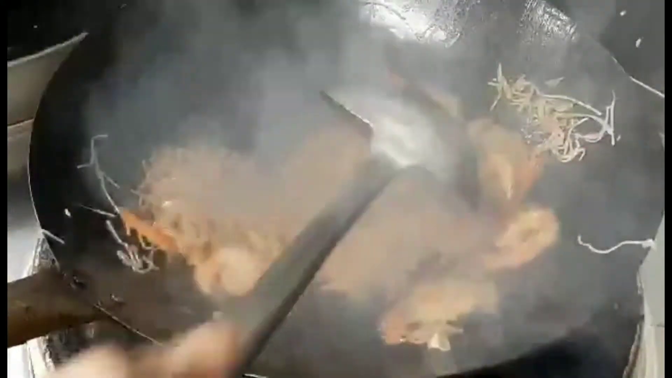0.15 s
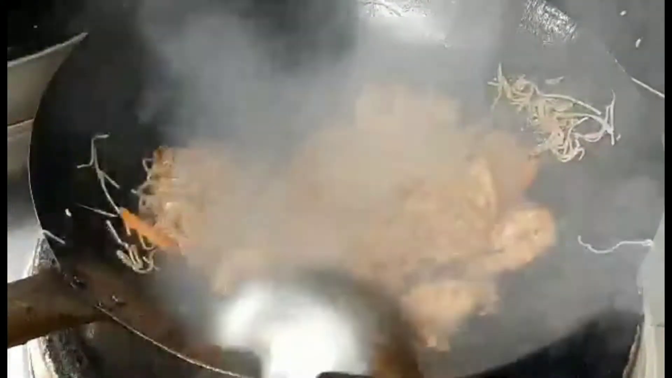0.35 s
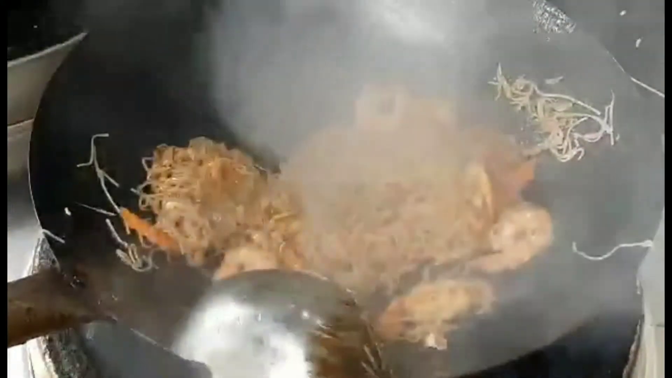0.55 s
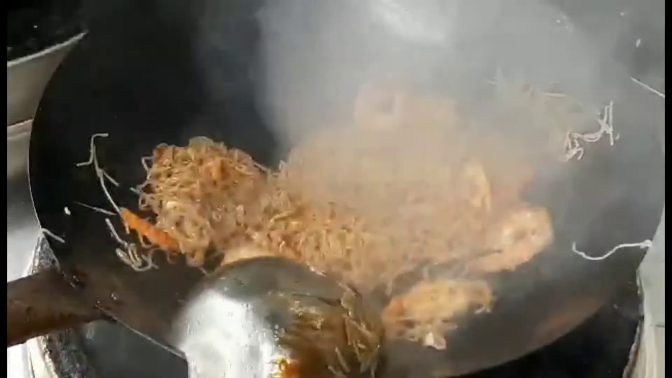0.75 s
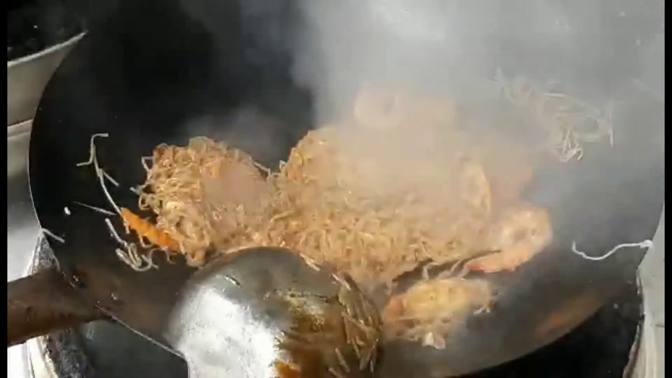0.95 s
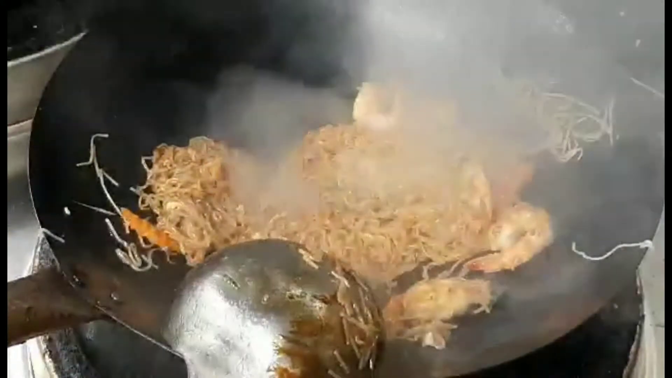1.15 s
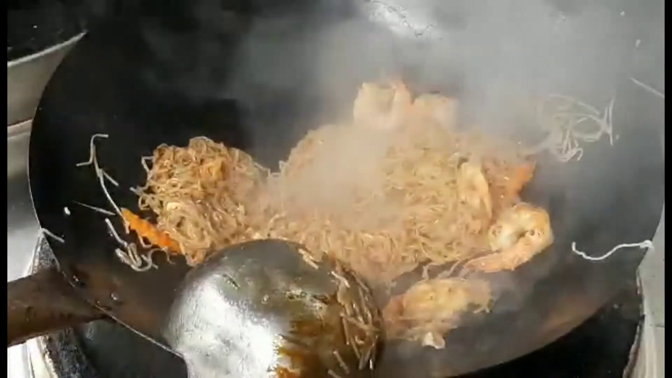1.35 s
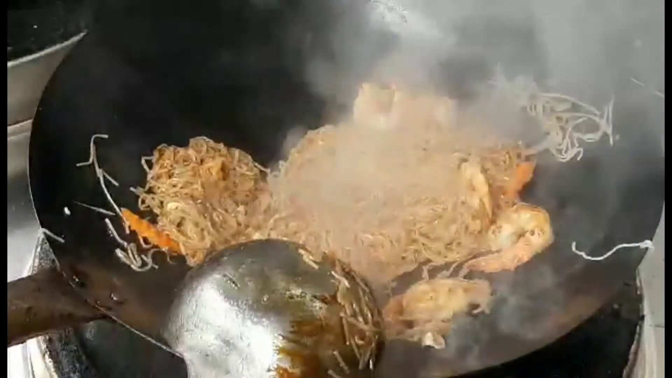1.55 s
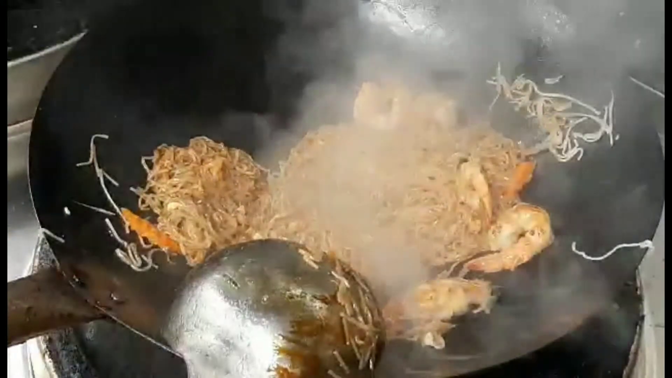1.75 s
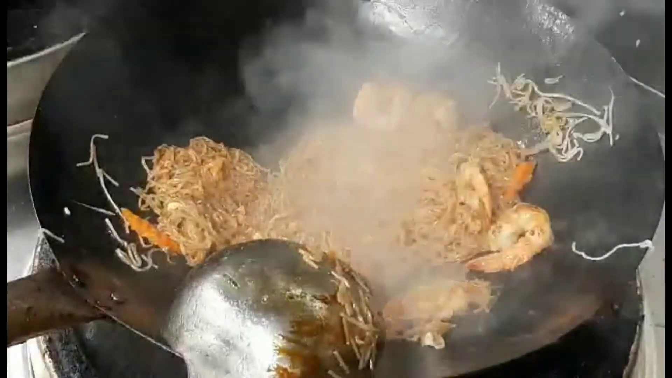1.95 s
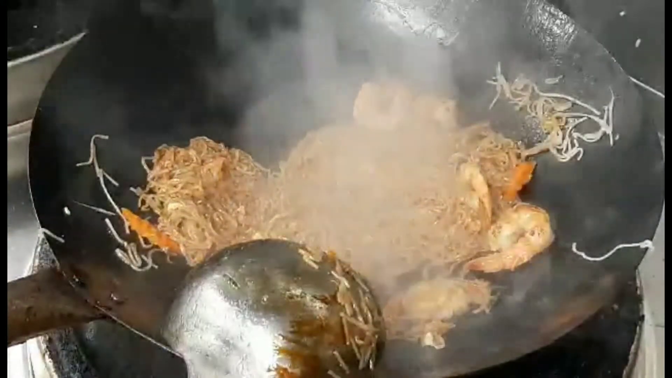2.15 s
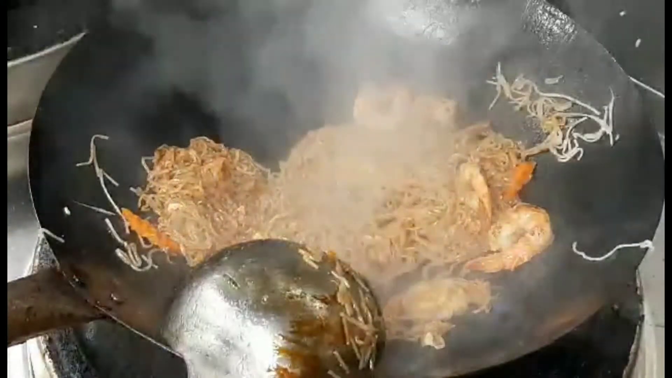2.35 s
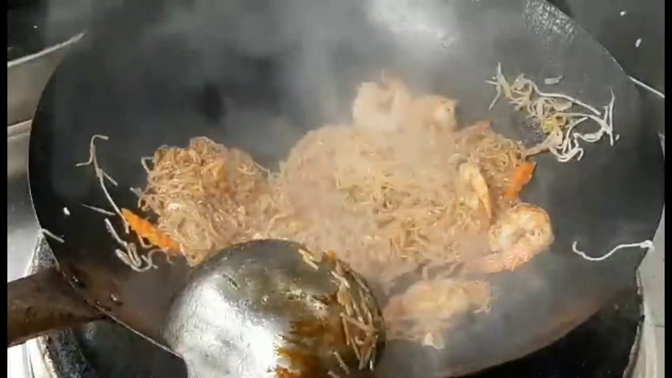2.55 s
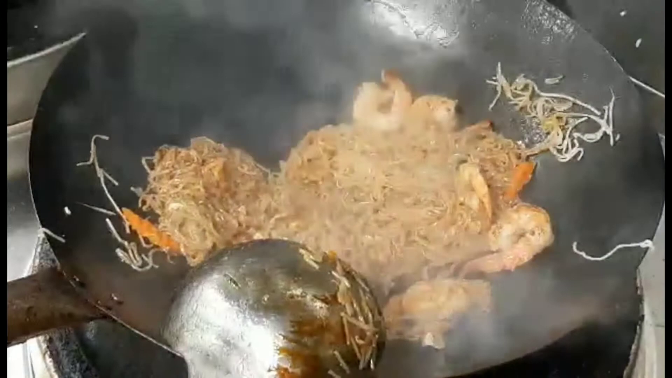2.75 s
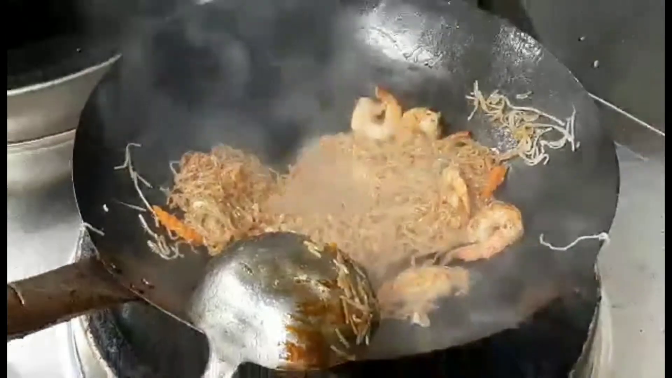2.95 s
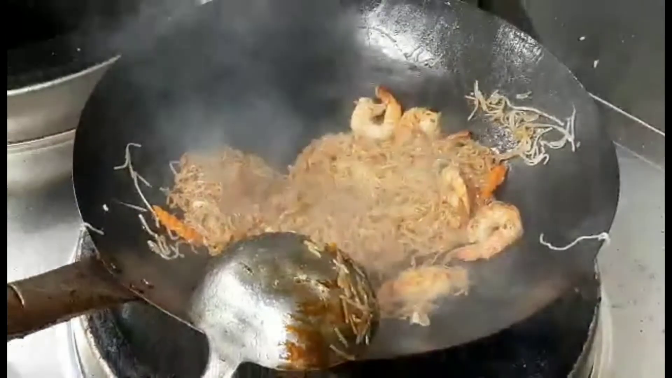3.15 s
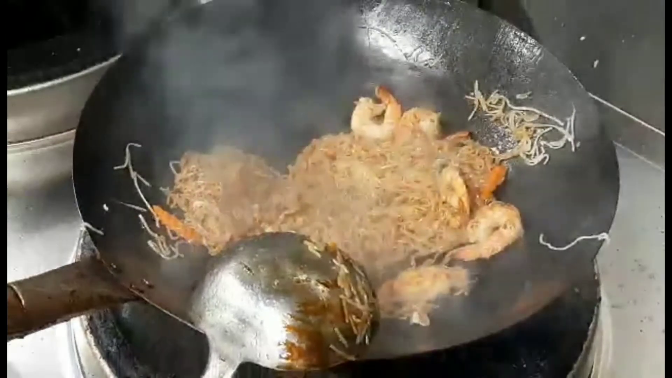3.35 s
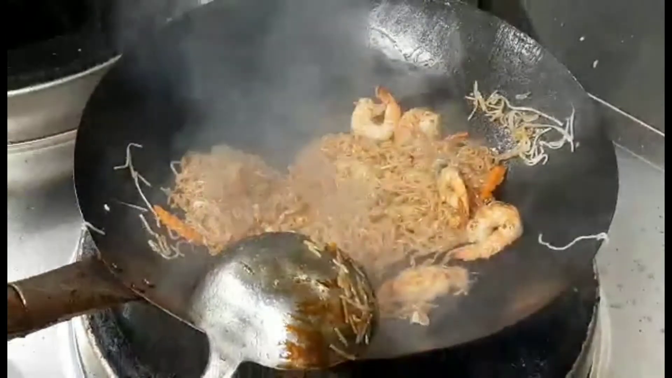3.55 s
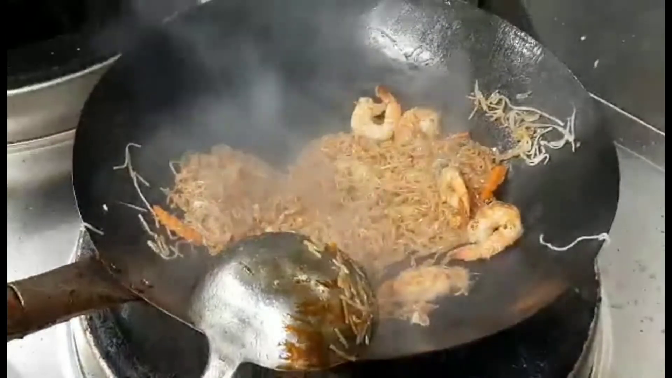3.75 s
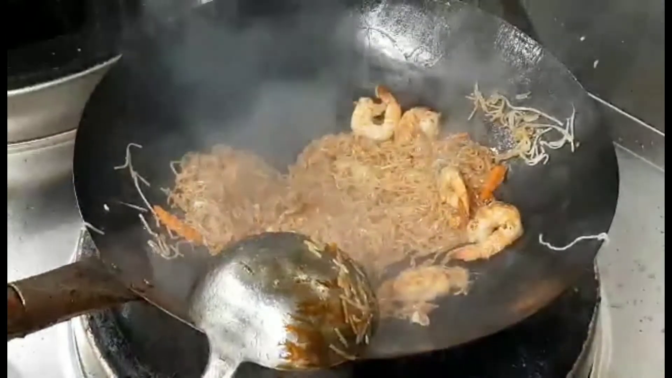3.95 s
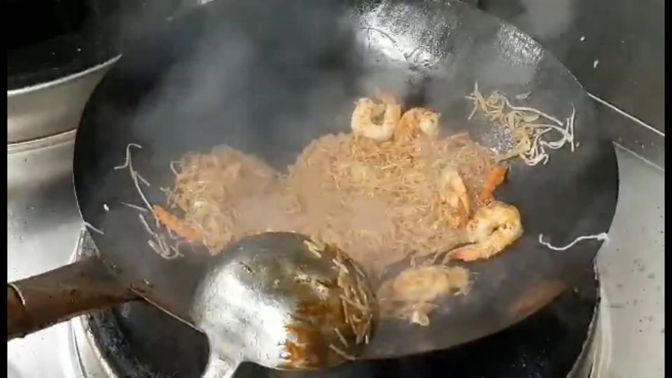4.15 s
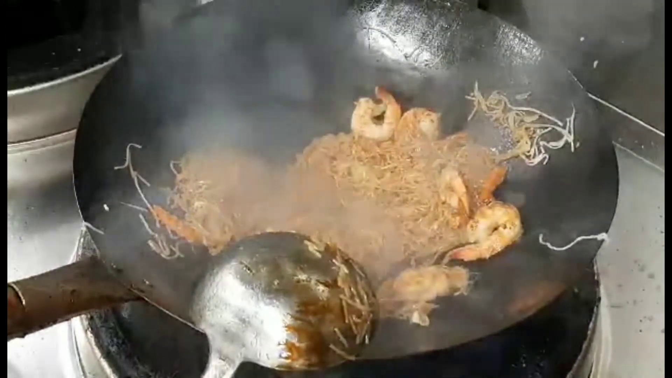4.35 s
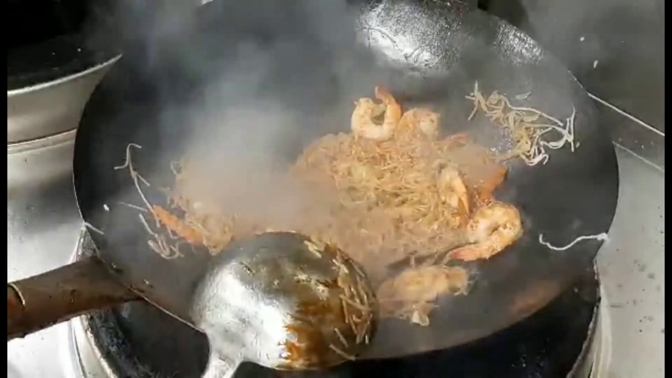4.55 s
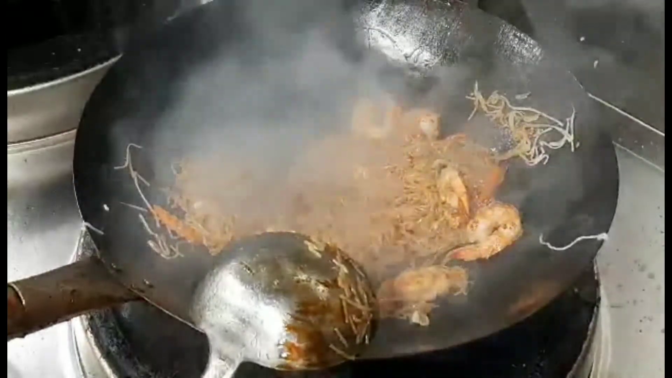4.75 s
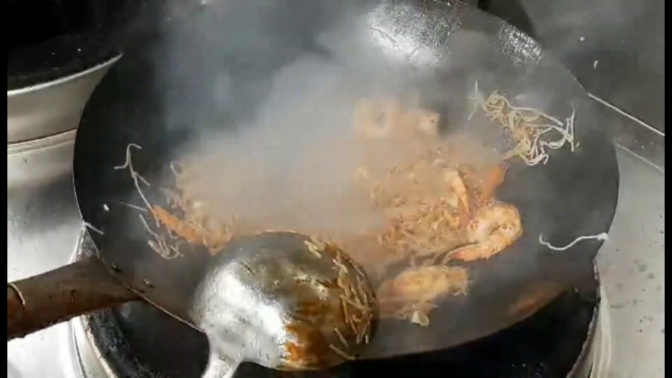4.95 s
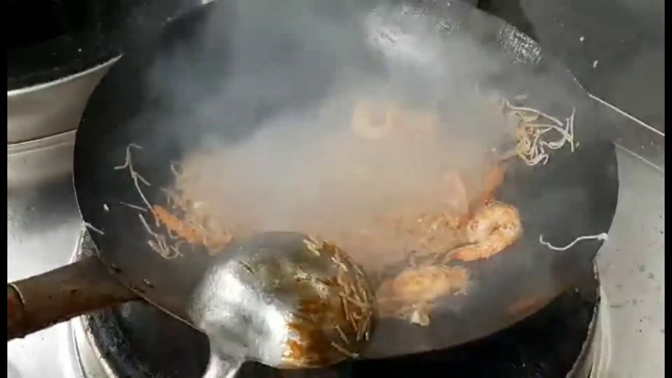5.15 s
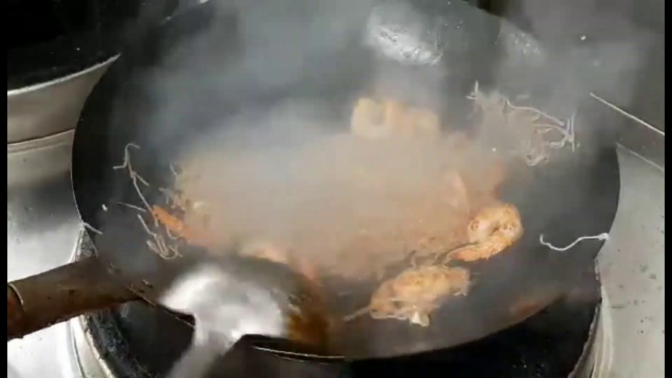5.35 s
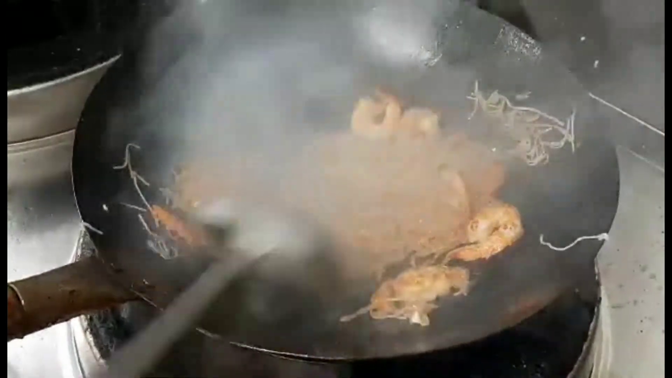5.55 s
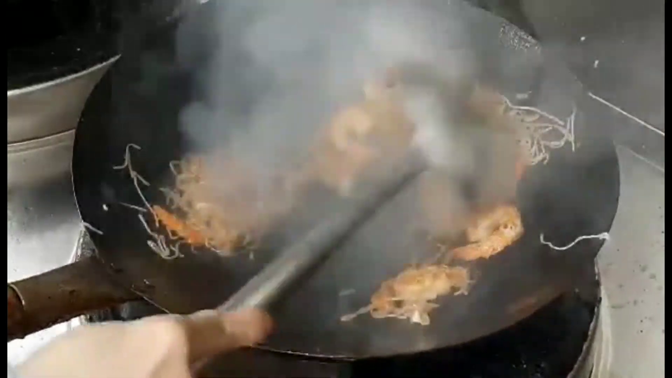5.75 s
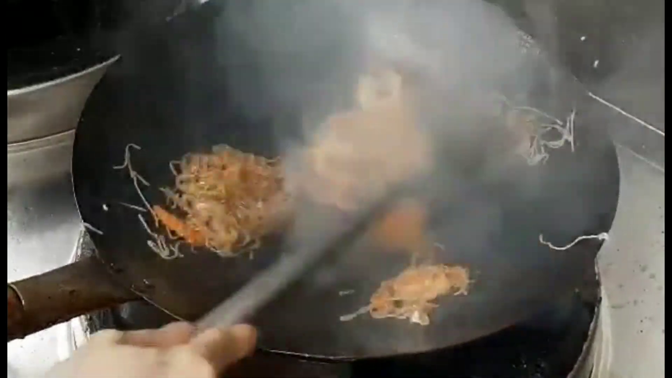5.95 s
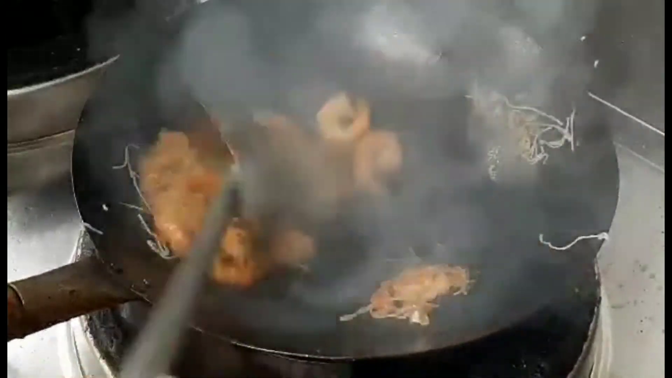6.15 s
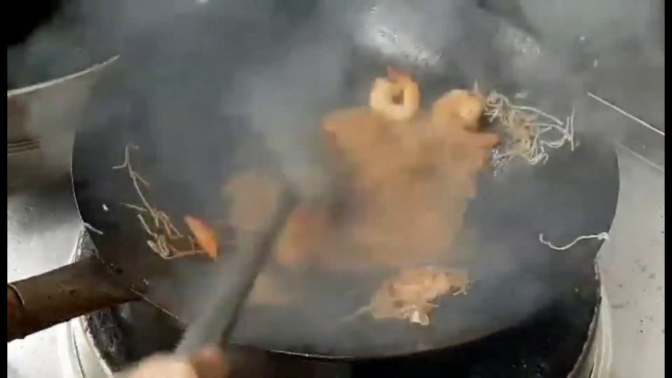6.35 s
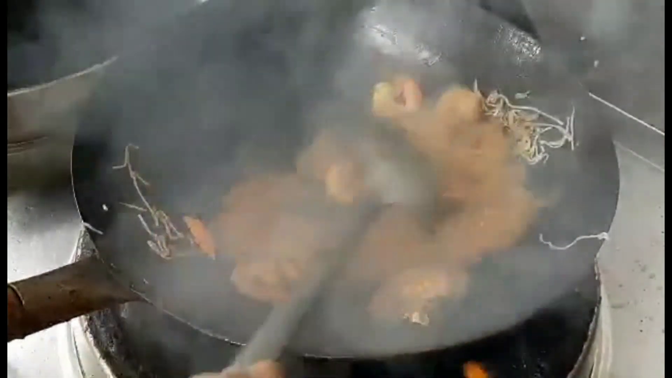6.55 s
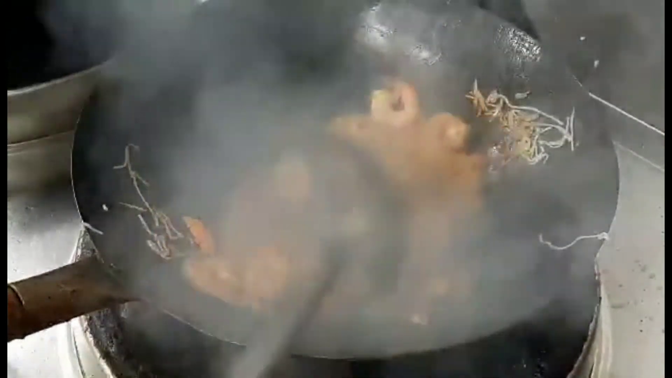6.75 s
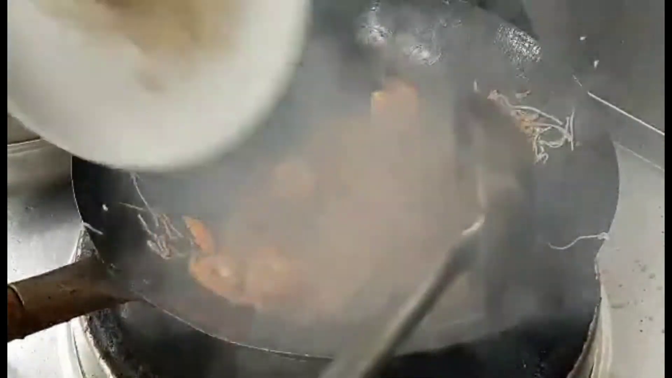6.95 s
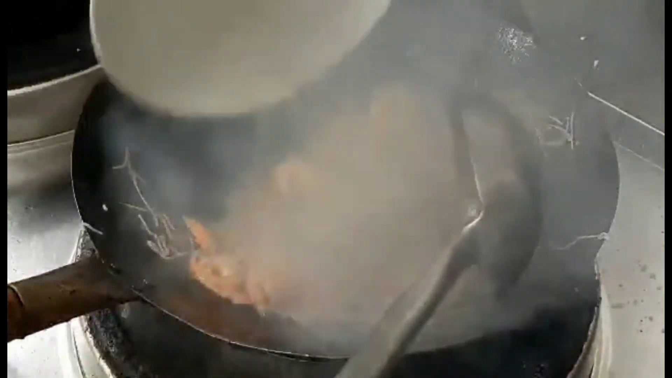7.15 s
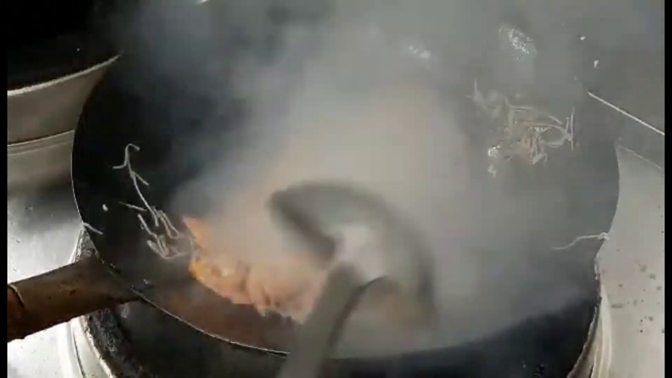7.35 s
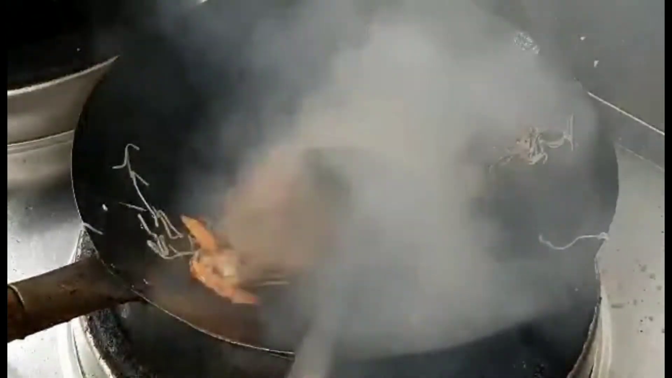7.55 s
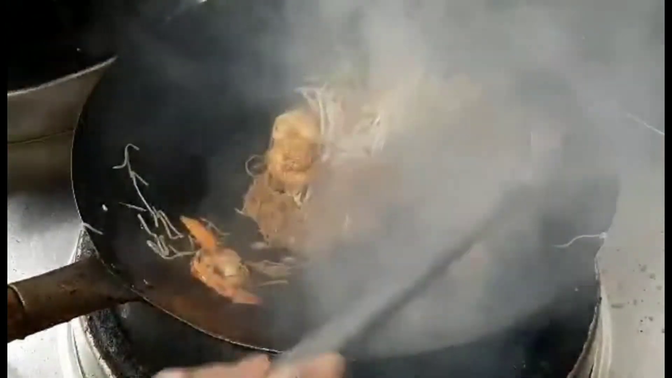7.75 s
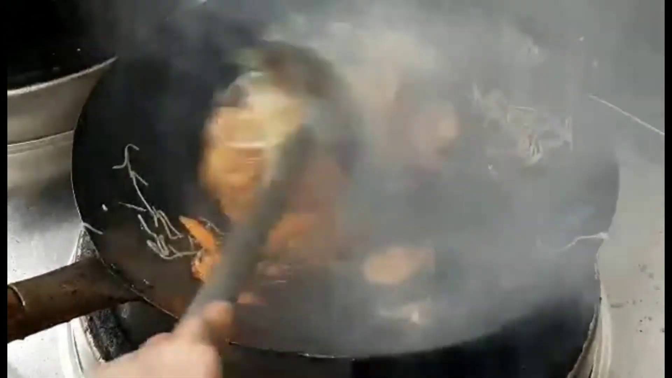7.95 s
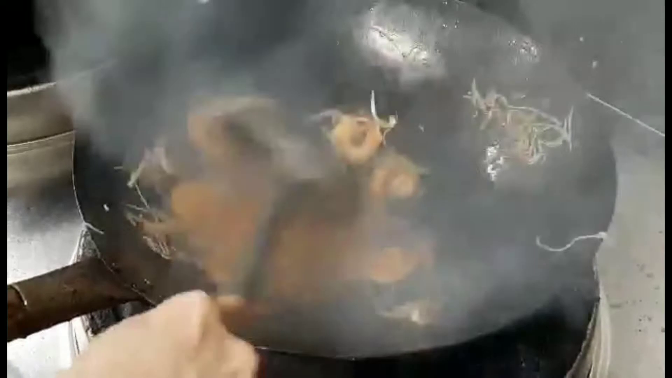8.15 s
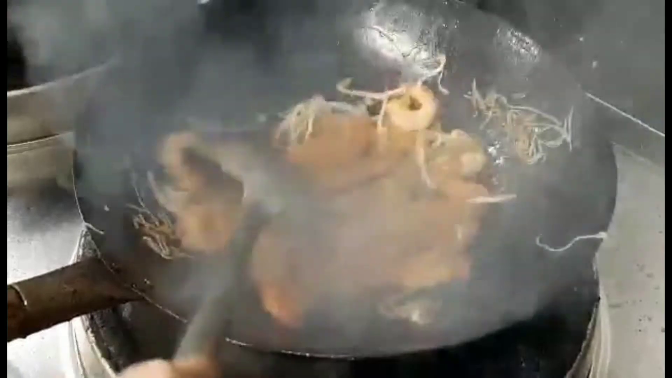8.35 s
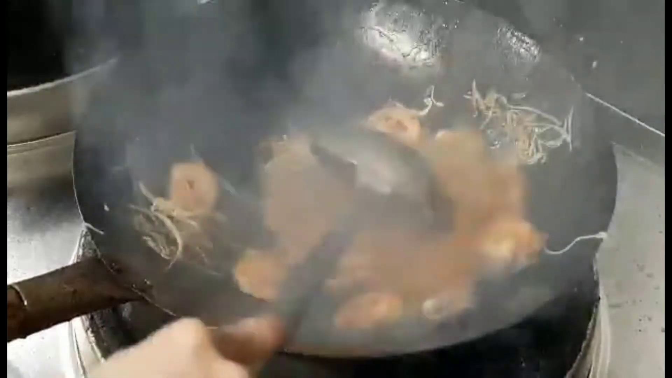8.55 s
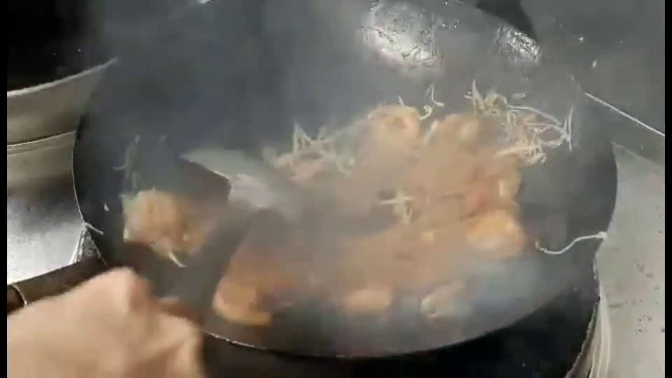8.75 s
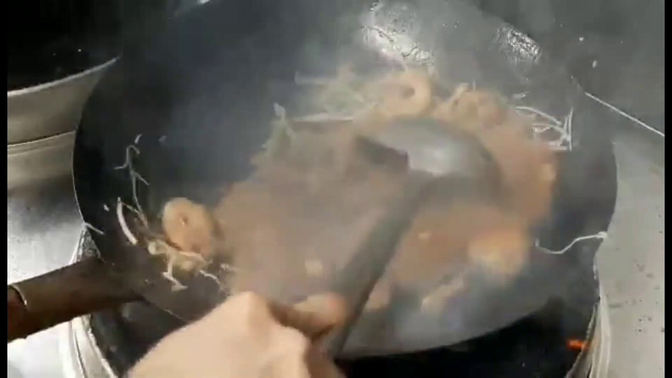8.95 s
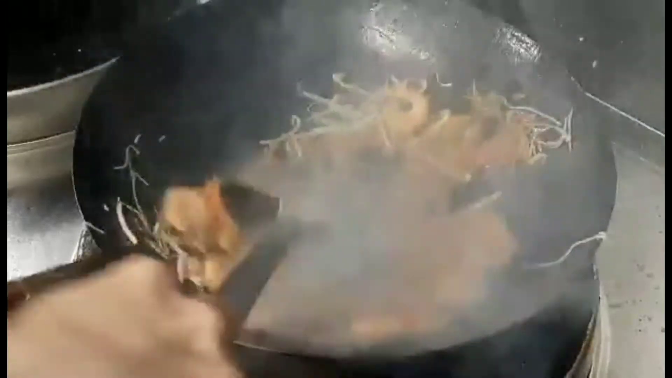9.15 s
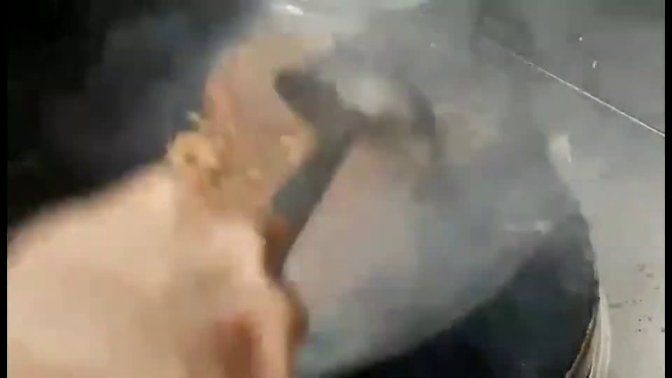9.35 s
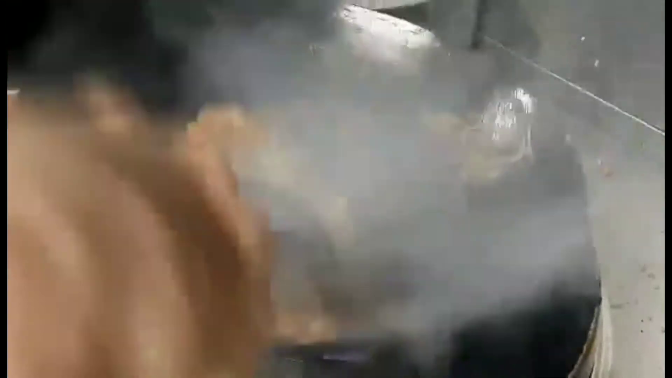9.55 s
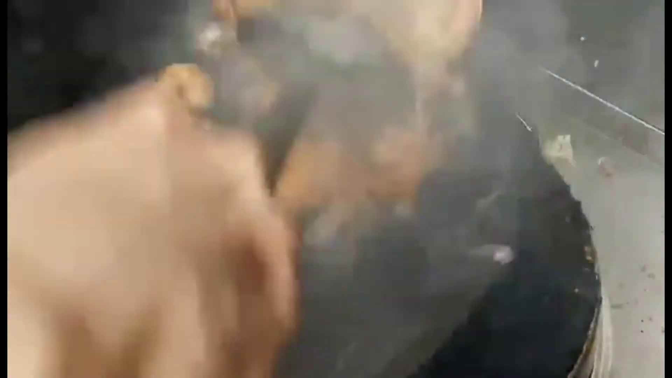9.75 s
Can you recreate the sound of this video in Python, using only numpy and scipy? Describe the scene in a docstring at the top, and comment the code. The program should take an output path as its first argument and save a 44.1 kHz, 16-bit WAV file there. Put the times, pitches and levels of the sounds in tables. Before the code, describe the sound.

A low, uneven burner rumble fills a hard, reflective kitchen, heard close over the pan in wide stereo. A steel ladle claps and scrapes the wok early, then rests while food softly sizzles and oil snaps. Later come repeated stirring scrapes, short damped clanks, hollow booms of the wok against the stove, and wetter, spitting swells of frying.

```python
"""In a hard-walled kitchen, noodles and prawns fry in a steel wok over a forced-air gas burner.
Heard from just above the pan, shaped noise makes the flame drone and roar, and sine tones make the blower hum.
Random bursts make the food sizzle and spit, louder when it is turned; a few drops of oil pop.
A steel ladle knocks, chatters and scrapes: its contacts ring the wok, a ring damped by the food.
The wok also booms as it is shoved against the stove."""
import sys
import numpy as np
from scipy import signal
from scipy.fft import rfft, irfft
from scipy.io import wavfile
from scipy.ndimage import uniform_filter1d

SR = 44100
rng = np.random.default_rng(int(sys.argv[2]) if len(sys.argv) > 2 else 0)


def output_pcm(signal):
    """Save a mono or channel-first signal as 16-bit PCM at the path in sys.argv[1].

    Samples are clipped to [-1, 1] before scaling.
    """
    pcm = np.clip(np.atleast_2d(signal).T, -1, 1) * 32767
    wavfile.write(sys.argv[1], SR, np.round(pcm).astype(np.int16))


N = 431736
T = np.arange(N) / SR
FREQS = np.fft.rfftfreq(N, 1 / SR)

# All levels are relative within their own layer; t60_s is the time to fade by 60 dB.
# blower tones: pitch_hz, level_db (rms)
BLOWER_TONES = [(563, -43.5), (751, -49), (939, -48)]
# a deep hum that rises in pitch: time_s, pitch_hz, level_db (rms)
DEEP_HUM = [(0, 35, -50), (3, 35.5, -46), (6.5, 35, -48), (7, 42, -39), (7.5, 53.3, -44), (7.9, 56, -58),
            (9.79, 56, -65)]

# flame noise: pitch_hz, level_db (per Hz)
FLAME_ROAR = [(22, -85), (45, -59.5), (70, -66), (95, -43), (170, -50), (340, -55), (520, -59), (1000, -62),
              (1450, -64), (2000, -68), (3000, -76.5), (6000, -102)]
# stove cavity and wok above it, rung by the flame: pitch_hz, width_hz, level_db (per Hz)
CAVITY_RESONANCES = [(150.8, 5.9, -43), (207.3, 21, -48.5), (235.1, 13.6, -43), (267.8, 9.5, -46),
                     (280, 9, -57), (314, 9.6, -49), (378.5, 8.2, -45), (405.2, 19.7, -42),
                     (428, 15, -55.5), (456, 14, -51), (672, 52, -58), (762, 18.4, -53.5),
                     (1000, 59, -62.5), (1216, 25, -59), (1494, 26, -59), (2027, 73, -65), (3466, 170, -67),
                     (3760, 140, -70.5)]
# strength of the flame noise: time_s, level_db
FLAME_LEVEL = [(0, 0), (.8, -1), (1.8, 0.5), (5.3, 0.5), (6.2, -1), (7.3, 0), (8.6, -1.5), (9.79, -1)]
# the flame's main resonance: pitch_hz, width_hz, level_db
DRONE_RESONANCES = [(108, 4.2, -7), (116.2, 12.7, 3.5), (140.2, 3.6, -14.5)]
# one random course of the low drone's level: time_s, level_db
DRONE_COURSE = [(0.0, -19), (0.87, -20), (1.07, -25), (2.57, -20), (2.77, -15.5), (3.25, -24), (4.05, -19),
                (4.3, -23.5), (5.29, -22.5), (5.45, -16.5), (6.53, -23.5), (6.77, -15.5), (7.16, -29),
                (7.84, -17), (8.45, -28), (8.73, -18), (9.01, -26.5), (9.79, -27)]
THROB_HZ, THROB_DB, DRONE_TRIM_DB = 15, 1, -0.6  # the drone's quick random throb: rate, depth; level trim

# colour of the fine steam bursts: pitch_hz, level_db
SIZZLE_COLOUR = [(1000, -20), (3000, -6), (5000, -2.5), (7000, -2), (9500, 1.5), (11500, 1), (13000, -0.5)]
# colour of the wetter bursts: pitch_hz, level_db
SPIT_COLOUR = [(600, -35), (1500, -10.5), (2300, 0.5), (3100, 0.5), (3500, 2), (4000, 1), (5200, -0.5),
               (7000, -10), (12000, -46)]
# the food is turned and wet sides meet hot steel: start_s, end_s, added_sizzle_db
FOOD_TURNS = [(-.13, 0, -26), (5.522, 5.9, -27), (6.12, 6.572, -23.5), (7.137, 7.52, -30.5),
              (7.577, 7.77, -23.5), (8.118, 8.66, -24.5), (8.848, 9.293, -24), (9.59, 9.72, -27)]
WETTING_S, DRYING_S = 0.082, 0.35  # a flare builds, then boils off
REST_SIZZLE_DB, REST_SPIT_DB = -29.5, -39.5  # food lying still
FLARE_SPIT_DB = -6.5  # spitting of a flare, relative to its sizzle
# the wok is tossed and the food leaves the steel: time_s (top of its flight)
TOSS_TIMES = [9.423, 11]
FLIGHT_S, FLIGHT_DB = 0.084, -7  # half the time in the air; drop of the frying meanwhile
# drops of oil that pop: time_s, level_db
OIL_POPS = [(2.7768, -19), (3.6484, -28), (3.7716, -23), (4.0539, -21), (5.227, -20), (5.4059, -17)]

# the wok is shoved against the stove: time_s, level_db, pitch_hz
STOVE_BUMPS = [(.363, -7, 405), (5.596, -15, 503), (5.872, -16, 540), (5.889, -10, 395), (7.764, -7, 400),
               (9.245, -6, 324), (9.250, -11.5, 540), (9.257, -11, 199), (9.274, -5.5, 272)]
# modes (natural tones) of that boom: pitch_ratio, level_db, t60_s
BOOM_MODES = [(.8, -13, 0.06), (1, 1.5, 0.082), (1.36, -8.5, 0.1), (1.9, -13, 0.066)]

# ladle strokes along the steel and through the food: start_s, end_s, level_db, start_rasp_hz, end_rasp_hz
LADLE_STROKES = [(0, 0.09, -42, 3000, 3300), (.368, 0.451, -31, 3000, 3400),
                 (.44, 0.607, -36.5, 3100, 2870), (1.05, 1.307, -40, 3340, 2960),
                 (5.33, 5.465, -37, 3280, 3100), (5.565, 5.76, -44, 3000, 5230),
                 (6.08, 6.232, -36, 3000, 3400), (6.306, 6.516, -32.5, 2950, 4100),
                 (7.783, 7.9, -44, 3500, 3000), (8.2, 8.41, -37, 3000, 4200), (8.76, 8.89, -40, 3200, 3600),
                 (8.95, 9.2, -40, 4500, 3500), (9.56, 9.768, -33.5, 3260, 3880)]
# resonances of steel rubbing on steel: ratio_to_rasp_pitch, half_width_hz, level_db
RASP_RESONANCES = [(0.98, 270, 5), (0.715, 330, 1), (1.35, 1000, 2.5)]
# ladle on wok: time_s, clank_db, brightness_db, thud_db (above the clank), thud_hz, chatter_decay_s,
# rebound_strength (ratio), rebound_delay_s, ladle_ring_db (above the clank), then the ring's
# lower_hz and upper_hz, set by the spot that strikes
LADLE_KNOCKS = [(.358, -17, -3, -6, 700, .009, 0.34, 0.0036, -11.5, 1530, 2900),
                (.365, -18, -10, -3, 805, 0.018, 0.36, .018, -6, 1510, 3000),
                (.407, -20.5, -6, 2, 680, 0.014, 0.29, 0.015, -8, 1450, 3100),
                (.617, -21, -4.5, -11, 900, .011, 1, .005, -10, 1030, 3100),
                (1.072, -23.5, -9, 6.5, 640, 0.045, .2, 0.03, -18, 1110, 3900),
                (4.031, -29.5, -5, -20, 700, 0.0083, .6, 0.0058, 1.5, 1700, 3460),
                (5.338, -31, -9, 9.5, 850, 0.012, .1, 0.033, -13, 950, 1400),
                (5.526, -29, -12, 11, 940, .045, .1, 0.024, -14, 600, 1100),
                (5.577, -33, -3, -6, 800, .008, .3, .01, -4, 1100, 3300),
                (5.596, -29, -5, 10, 554, 0.012, 0.081, 0.013, -6, 1000, 3500),
                (5.872, -24.5, -7, 11, 740, 0.005, 0.22, .01, -4, 1050, 3100),
                (5.889, -25, -4, 12, 560, .005, 0.4, 0.037, -2, 980, 3300),
                (6.181, -37, -5, -15, 700, .003, .2, 0.011, -10, 1900, 3700),
                (7.41, -22.5, 0, 4.5, 720, 0.005, 0.68, 0.0045, -7.5, 1090, 3900),
                (7.500, -32, 0, -10, 700, 0.0043, .2, .01, -7, 1700, 3500),
                (7.745, -22.5, 0.5, 6.5, 680, 0.005, 0.64, .007, -7, 900, 3450),
                (7.766, -24.5, 2, 8, 517, 0.0067, 0.16, .012, -2, 720, 3700),
                (8.251, -30, -1, -6, 600, .004, .2, .012, -12, 1900, 4300),
                (8.444, -24, -1, 0, 420, .010, 0.65, .009, -7, 1385, 2300),
                (8.866, -31, 0, -10, 700, .004, .2, 0.013, -12, 1860, 4000),
                (9.243, -27, 2, 14, 550, .008, 0.33, 0.019, -3, 860, 4100)]
REBOUND_PITCH, REBOUND_THUD_DB = 0.59, 1.5  # the second contact: thud pitch ratio, extra thud
# one cluster of the ladle's modes: pitch_ratio, level_db, t60_s
LADLE_MODES = [(.79, -6, .04), (.91, -3, .045), (.96, -1, .055), (1, 0, .06), (1.05, -1, .05),
               (1.13, -5, .04), (1.36, -10, .03)]
# modes of the wok: pitch_hz, level_db, t60_s
WOK_MODES = [(250, -11, 0.062), (353, 7.5, 0.11), (403, 4.5, 0.14), (534, 0, 0.048), (627, -2, 0.036),
             (710, 0, 0.058), (838, 0.5, 0.092), (932, 3.5, 0.13), (1042, 1, 0.083), (1410, -4, 0.049),
             (1514, 0.5, 0.044), (2570, -6, 0.071), (2657, 3.5, 0.091), (3240, -8, 0.067),
             (3390, -14, 0.063), (3600, -7, 0.07)]
# the wok's crowded higher modes and the kitchen walls: pitch_hz, level_db
CLATTER_COLOUR = [(120, -23), (290, 2), (400, 10), (600, 2), (900, 2), (1200, -2), (1500, 2), (1950, -17),
                  (2700, -5.5), (3500, 3.5), (5200, -14.5), (7000, -35), (13000, -22)]

# likeness of left and right: pitch_hz, correlation (0 to 1)
LIKENESS = [(100, 1), (250, 0.98), (500, 0.78), (1000, 0.16), (2500, 0.35), (5000, 0.0007), (12000, 0.0089)]
# the microphone's treble notch: pitch_hz, level_db
MIC_NOTCH = [(8100, -0.5), (8500, -8.5), (9300, -7.5), (10600, -3), (11500, 0)]
TOP_HZ = 13030  # nearly nothing passes above this


def undb(db):
    """Turn decibels into a gain."""
    return 10 ** (np.asarray(db) / 20)


def unit(x):
    """Scale to an rms (average strength) of 1."""
    return x / np.sqrt(np.mean(x ** 2))


def curve(rows):
    """Give the columns of a time table at every sample."""
    s, *columns = np.transpose(rows)
    return [np.interp(T, s, column) for column in columns]


def along_hz(points):
    """Give the values of a pitch table at every frequency."""
    hz, value = np.transpose(points)
    return np.interp(np.log(FREQS + 1), np.log(hz), value)


def shape(x, gain):
    """Filter by a gain at every frequency."""
    return irfft(rfft(x) * gain, N)


def resonances(rows):
    """Join steep-sided resonances into one gain at every frequency."""
    power = 0
    for hz, width, db in rows:
        peak = undb(db) / (1 + ((FREQS - hz) / width) ** 2) ** 2
        power = power + peak ** 2
    return np.sqrt(power)


def walk(rate_hz):
    """Smooth random wander with spread 1."""
    return unit(shape(rng.standard_normal(N), np.exp(-(FREQS / rate_hz) ** 2)))


def spread(pair):
    """Two unrelated signals become left and right: alike in the bass, almost unrelated in the treble."""
    alike = np.clip(along_hz(LIKENESS), 0, 1)
    mid = shape(pair[0], np.sqrt((1 + alike) / 2))
    side = shape(pair[1], np.sqrt((1 - alike) / 2))
    return np.array([mid + side, mid - side])


def ticks(rate_hz, scatter_db):
    """Two streams of randomly timed impulses of uneven size, rms 1."""
    scatter = np.clip(rng.standard_normal((2, N)), -2, 2)
    size = undb(scatter_db * scatter) * rng.choice([-1, 1], (2, N))
    return unit(size * (rng.random((2, N)) < rate_hz / SR))


def tail(t60):
    """A dying wash of dense reflections for each side, energy 1."""
    return unit(rng.standard_normal((2, N)) * undb(-60 * T / t60)) / np.sqrt(N)


def linger(x, t60):
    """Diffuse reflections: fresh noise that follows the dying energy of x."""
    keep = undb(-120 / (t60 * SR))  # energy kept from one sample to the next
    energy = signal.lfilter([1 - keep], [1, -keep], np.mean(x ** 2, axis=0))
    return rng.standard_normal((2, N)) * np.sqrt(energy)


def blower():
    """Slightly unsteady blade tones sound over a deep hum."""
    seconds = np.cumsum(1 + 0.00326 * walk(6.7)) / SR  # a clock that wavers with the blower's speed
    tones = 0
    for hz, db in BLOWER_TONES:
        level = undb(db + 2 * walk(10.0))
        phase = rng.uniform(-1.5, 1, (2, 1))
        tones = tones + level * np.sin(2 * np.pi * hz * seconds + phase)
    hum_hz, hum_db = curve(DEEP_HUM)
    hum = undb(hum_db) * np.sin(2 * np.pi * np.cumsum(hum_hz) / SR)
    return np.sqrt(2) * (tones + hum)  # peak level of a sine with the given rms


def burner():
    """Turbulent flame noise rings the stove cavity; the low drone's level wanders and throbs at random."""
    noise = rng.standard_normal((2, N)) * np.sqrt(SR / 2)  # level 1 per Hz
    roar = spread(shape(noise, np.hypot(undb(along_hz(FLAME_ROAR)), resonances(CAVITY_RESONANCES))))
    roar *= undb(curve(FLAME_LEVEL)[0] + 0.56 * walk(21))
    drone = spread(shape(rng.standard_normal((2, N)), resonances(DRONE_RESONANCES)))
    # level out the noise's own slow swings, then apply the course from the table
    drone /= np.sqrt(uniform_filter1d(np.mean(drone ** 2, axis=0), size=SR // 7))
    drone_db = curve(DRONE_COURSE)[0] + DRONE_TRIM_DB + THROB_DB * walk(THROB_HZ)
    return roar + drone * undb(drone_db)


def bubbles(low_hz, high_hz, cycles, scatter_db, count):
    """Bursting bubbles: each rings for some cycles at its own pitch, in a different phase at each ear."""
    when, pitch, lag, chance = rng.random((count, 4)).T[:, :, None]
    hz = low_hz + (high_hz - low_hz) * pitch
    k = np.arange(SR // 100)  # samples since the burst
    size = undb(scatter_db * np.minimum(-np.log(chance), 3))  # many small, a few large
    ring = size * np.exp(-hz * k / SR / cycles)
    where = (when * N).astype(int) + k
    sides = []
    for turn in (0, lag):
        side = ring * np.sin(2 * np.pi * (hz * k / SR + turn))
        sides.append(np.bincount(where.ravel(), side.ravel(), N)[:N])
    return unit(np.array(sides))


def boiling():
    """Gains of sizzle and spit: steady at rest, flaring as food is turned, dropping while it is in the air."""
    power = 0
    for start, end, db in FOOD_TURNS:
        wetting = 1 - np.exp(-np.maximum(T - start, 0) / WETTING_S)
        drying = np.exp(-np.maximum(T - end, 0) / DRYING_S)
        power = power + undb(db) ** 2 * wetting * drying
    flare = np.sqrt(power)
    airborne = sum(np.exp(-((T - s) / FLIGHT_S) ** 2) for s in TOSS_TIMES)
    contact = undb(FLIGHT_DB * airborne)
    sizzle = contact * np.hypot(undb(REST_SIZZLE_DB), flare)
    spit = contact * np.hypot(undb(REST_SPIT_DB), undb(FLARE_SPIT_DB) * flare)
    return sizzle, spit


def frying(waver_db=1.25, waver_hz=20):
    """Tiny steam bursts merge into a sizzle; wetter ones spit lower down; bubbles ring briefly among them."""
    sizzle, spit = boiling()
    small = bubbles(low_hz=4000, high_hz=15000, cycles=24, scatter_db=5, count=8000)
    large = bubbles(low_hz=1200, high_hz=6000, cycles=14, scatter_db=4, count=4000)
    fine = ticks(rate_hz=9900, scatter_db=1.5) + undb(-8.0) * small
    wet = ticks(rate_hz=800, scatter_db=3) + undb(-4.5) * large
    layers = []
    for bursts, colour, level in (fine, SIZZLE_COLOUR, sizzle), (wet, SPIT_COLOUR, spit):
        echoed = bursts + undb(4) * linger(bursts, t60=0.23)
        waver = undb(waver_db * walk(waver_hz))  # the level wavers quickly at random
        coloured = unit(spread(shape(echoed, undb(along_hz(colour)))))
        layers.append(coloured * level * waver)
    return sum(layers)


def pops(decay_s=0.0023, pop_db=1):
    """A drop of oil bursts with a short bright crack of noise."""
    envelope = sum(undb(db + pop_db) * (T >= s) * np.exp(-np.abs(T - s) / decay_s) for s, db in OIL_POPS)
    treble = signal.butter(2, 4500, "high", fs=SR)
    return envelope * signal.lfilter(*treble, rng.standard_normal((2, N)))


def bumps(rise_s=0.0044):
    """The heavy wok rocks against the stove's rim with a short, hollow boom of fading tones."""
    out = np.zeros(N)
    for s, db, hz in STOVE_BUMPS:
        age = np.maximum(T - s, 0)
        near = (age > 0) & (age < .25)
        t = age[near]
        boom = 0
        for ratio, level, t60 in BOOM_MODES:
            boom = boom + undb(level - 60 * t / t60) * np.sin(2 * np.pi * hz * ratio * t)
        out[near] += undb(db) * (1 - np.exp(-t / rise_s)) * boom
    return out


def glide(x, hz, width_hz):
    """A resonance whose centre moves along hz; rms 1."""
    turn = np.exp(2j * np.pi * np.cumsum(hz) / SR)
    # shift the moving centre down to 0 Hz, keep what is near it, shift back
    near = signal.lfilter(*signal.butter(2, width_hz, fs=SR), x / turn)
    return unit((near * turn).real)


def scrapes(wok_db=-6, rasp_db=-3.5, judder_db=2, judder_hz=70):
    """The ladle sticks and slips unevenly: a force on the wok, and a rasp gliding as the contact travels."""
    slips = ticks(rate_hz=470, scatter_db=-2)
    grip = undb(judder_db * walk(judder_hz))
    force, rasp = np.zeros(N), np.zeros((2, N))
    for start, end, db, from_hz, to_hz in LADLE_STROKES:
        during = (T > start) & (T < end)
        way = (T[during] - start) / (end - start)  # 0 to 1 along the stroke
        pressure = undb(db) * 2 * np.sqrt(way * (1 - way)) * grip[during]
        hz = from_hz + (to_hz - from_hz) * way
        force[during] += pressure * slips[0, during]
        rub = 0
        for ratio, width, level in RASP_RESONANCES:
            rub = rub + undb(level) * glide(slips[:, during], hz * ratio, width)
        rasp[:, during] += pressure * rub
    bright_force = signal.lfilter(*signal.butter(1, 1400, "high", fs=SR), force)
    return undb(wok_db) * bright_force, undb(rasp_db) * rasp


def ladle_ring(body_hz, edge_hz):
    """The ladle's bowl, damped by the hand: two clusters of close modes, energy 1 for each side."""
    t = T[:SR // 8]
    ring = 0
    for hz in (body_hz, edge_hz):
        for ratio, db, t60 in LADLE_MODES:
            phase = rng.standard_normal((2, 1))
            ring = ring + undb(db - 60 * t / t60) * np.sin(2 * np.pi * hz * ratio * t + phase)
    return ring / np.linalg.norm(ring, axis=1, keepdims=True)


def knocks(body_hz=350, bright_hz=2200, chatter_db=5, blow_db=26.0, thud_span=1.34):
    """Each blow and its rebound is a sharp contact, dying chatter and thud: force on the wok, and ladle ring."""
    force, ladle = np.zeros(N + SR), np.zeros((2, N + SR))
    t = T[:SR // 4]
    middle = signal.butter(1, [body_hz, bright_hz], "band", fs=SR)
    high = signal.butter(2, bright_hz, "high", fs=SR)
    for (s, db, brightness_db, thud_db, thud_hz, decay,
         rebound, delay, ring_db, bowl_hz, edge_hz) in LADLE_KNOCKS:
        ring = undb(ring_db) * ladle_ring(bowl_hz, edge_hz)
        first = s, 1, thud_db, thud_hz
        second = s + delay, rebound, thud_db + REBOUND_THUD_DB, thud_hz * REBOUND_PITCH
        for when, share, weight_db, hz in first, second:
            signs = rng.choice([-1, 1], len(t))
            chatter = signs * (rng.random(len(t)) < .05) * np.exp(-t / decay)
            contact = (t == 0) + undb(chatter_db) * chatter / np.linalg.norm(chatter)
            push = share * undb(db + blow_db) * contact
            clank = signal.lfilter(*middle, push) - undb(brightness_db) * signal.lfilter(*high, push)
            thud_band = signal.butter(2, [hz / thud_span, hz * thud_span], "band", fs=SR)
            thud = signal.lfilter(*thud_band, push)
            start = int(when * SR)
            force[start:start + len(t)] += clank + undb(weight_db) * thud
            ladle[:, start:start + len(t)] += signal.fftconvolve(push[None], ring, axes=1)[:, :len(t)]
    return force[:N], ladle[:, :N]


def wok(force, ring_db=-5.0, crack_db=-10, clatter_db=-4.5):
    """Steel answers each contact with a crack, its modes and short clatter; the kitchen rings on faintly."""
    t = T[:SR // 2]
    lags = rng.standard_normal((len(WOK_MODES), 2, 1)) / 2  # each mode has its own phase at each ear
    modes = 0
    for (hz, db, t60), lag in zip(WOK_MODES, lags):
        modes = modes + undb(db - 60 * t / t60) * np.sin(2 * np.pi * hz * t + lag)
    crack_band = signal.butter(1, [1800, 6000], "band", fs=SR)
    crack = signal.lfilter(*crack_band, tail(t60=0.00028)[:, :len(t)])
    wash = tail(t60=0.15) + undb(3.5) * tail(t60=0.48)
    clatter = spread(shape(wash, undb(along_hz(CLATTER_COLOUR))))[:, :len(t)]
    response = 0
    for part, db in (modes, ring_db), (crack, crack_db), (clatter, clatter_db):
        response = response + undb(db) * part / np.linalg.norm(part, axis=1, keepdims=True)
    return signal.fftconvolve(force[None], response, axes=1)[:, :N]


def scene():
    """Add stove, food and ladle together."""
    rubbing, rasp = scrapes()
    blows, ladle = knocks()
    stove = blower() + burner()
    food = frying() + pops()
    return stove + food + bumps() + rasp + ladle + wok(blows + rubbing)


def record(dry):
    """The microphone colours the treble, the loudest peaks are rounded and the top is cut."""
    sound = shape(dry, undb(along_hz(MIC_NOTCH)))
    sound = sound / (1 + (sound / .8) ** 6) ** (1 / 6)
    top_cut = signal.ellip(12, .1, 80, TOP_HZ, fs=SR, output="sos")
    return signal.sosfilt(top_cut, sound)


dry = scene()
out = record(dry)
output_pcm(out)
```